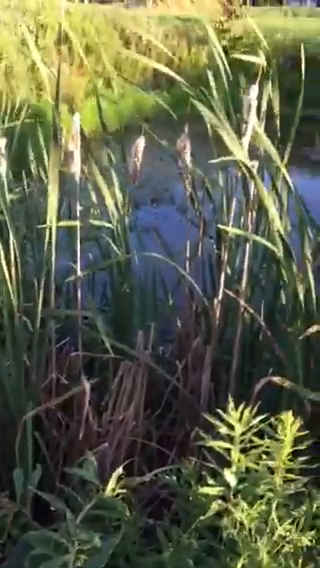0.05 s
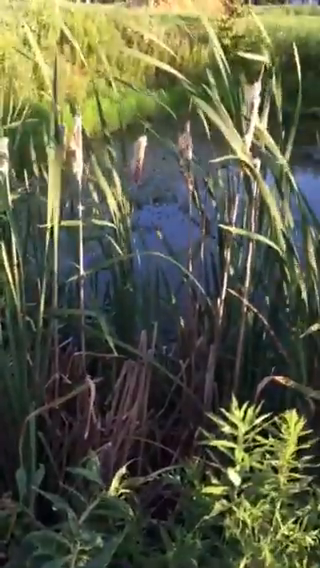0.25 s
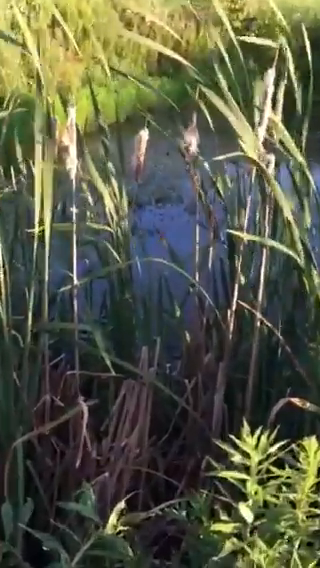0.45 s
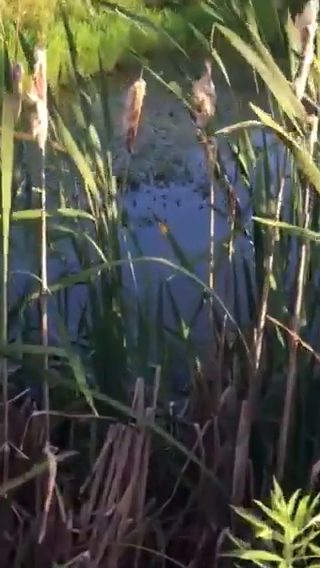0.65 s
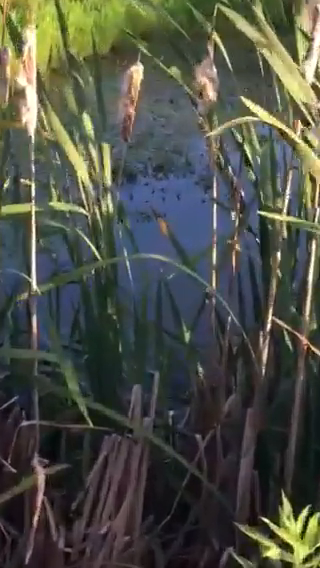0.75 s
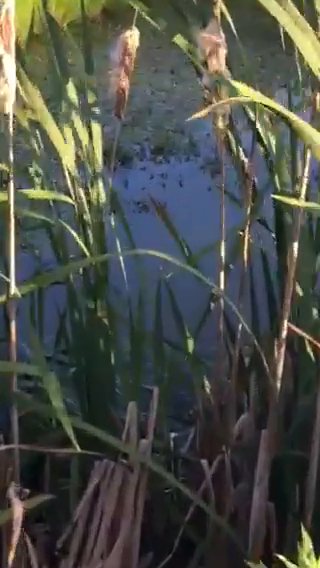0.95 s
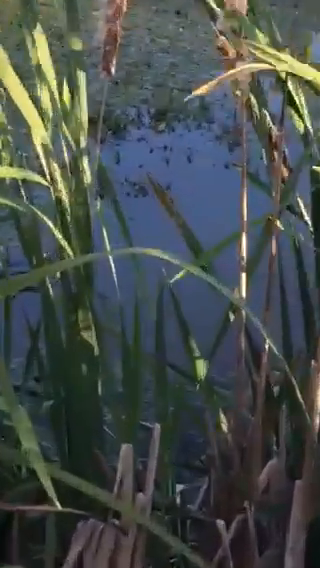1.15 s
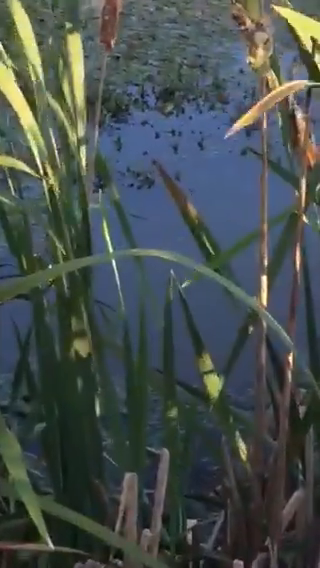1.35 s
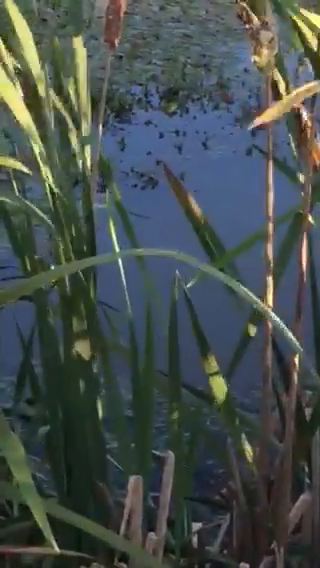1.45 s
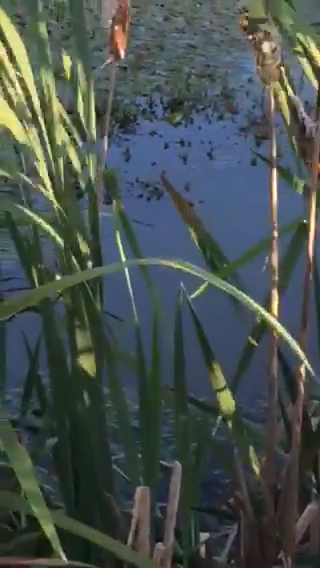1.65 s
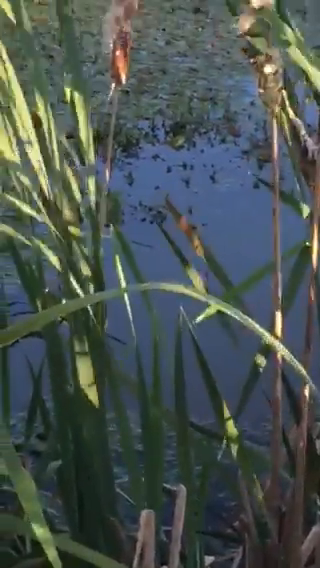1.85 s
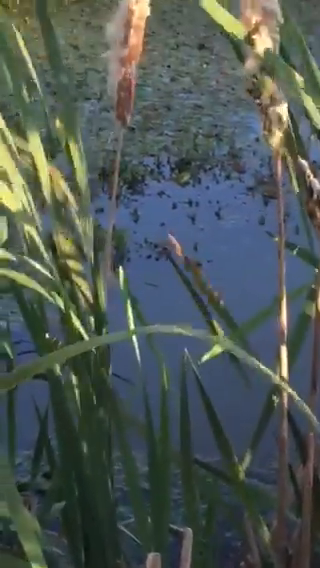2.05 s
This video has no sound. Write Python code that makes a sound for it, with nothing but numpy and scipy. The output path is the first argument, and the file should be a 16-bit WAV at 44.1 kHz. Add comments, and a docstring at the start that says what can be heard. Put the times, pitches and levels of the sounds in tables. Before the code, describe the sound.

Wind rumbles and thumps on the microphone, over a low drone and faint insect trills.

```python
"""Reeds at a pond edge, with distant traffic under everything. From the start, wind rumbles and flutters
on the microphone. An insect trills and faint far chirps begin. A gust strikes the microphone with dull
thumps, the hardest trailed by a brief bright hiss; then dry reeds rustle. As the wind settles to a low
rumble, a low drone, perhaps a bullfrog, swells. The insect trills again, and the drone fades away."""
import sys
import numpy as np
from scipy import signal
from scipy.fft import rfft, irfft
from scipy.io import wavfile
from scipy.ndimage import uniform_filter1d

SR = 44100
rng = np.random.default_rng(int(sys.argv[2]) if len(sys.argv) > 2 else 0)


def unload_wav(signal):
    """Save mono or channel-first audio to the path in sys.argv[1] as 16-bit WAV at rate SR, clipped to [-1, 1]."""
    wavfile.write(
        sys.argv[1],
        SR,
        np.round(np.clip(np.atleast_2d(signal).T, -1, 1) * 32767).astype(np.int16),
    )


N = 92610
TIME = np.arange(N) / SR
HZ = np.fft.rfftfreq(N, 1 / SR)

# short hisses; the first two trail the hardest wind thump, the rest are reed rustles:
# (middle [s], length [s], level [dB], pitch [Hz], width [Hz])
HISSES = [(.401, .012, -57, 1900, 800), (.42, .012, -55, 1500, 450), (.559, .007, -71, 10800, 1400),
          (1.047, .035, -73, 13900, 500), (1.042, .05, -78, 9000, 3000)]


def amp(db):
    """Turns decibels into a number to multiply a sound by (a gain)."""
    return 10 ** (np.asarray(db) / 20)


def unit(x):
    """Scales a signal to an average size (rms) of 1."""
    return x / np.sqrt(np.mean(x ** 2) + 1e-20)


def curve(points):
    """Joins (time, value) points with straight lines."""
    return np.interp(TIME, *np.transpose(points))


def colour(points, hz):
    """Reads the gain at hz from a curve of (frequency, level) points."""
    point_hz, db = np.transpose(points)
    return amp(np.interp(np.log(hz + 1), np.log(point_hz), db))


def noise(gain):
    """Noise of average size 1, with each frequency weighted by gain."""
    return unit(irfft(rfft(rng.standard_normal(N)) * gain, N))


def steady(x, size):
    """Evens out the chance swells of a noise over size samples."""
    power = abs(signal.hilbert(x)) ** 2
    return x / np.sqrt(uniform_filter1d(power, size) / 2 + 1e-9)


def band(hz, low_hz, high_hz, slope):
    """Gain that keeps low_hz to high_hz; a larger slope cuts the treble more steeply."""
    bass_cut = (hz / low_hz) ** 2 / np.hypot(1, (hz / low_hz) ** 2)
    return bass_cut / np.hypot(1, (hz / high_hz) ** slope)


def add(mix, start, sound):
    """Mixes a sound in, beginning at start seconds."""
    part = mix[max(round(start * SR), 0):][:len(sound)]
    part += sound[:len(part)]


def traffic(level_db=-59.5, patch_db=3.5, patch_top_hz=2200):
    """A far wash of tyres with narrow, drifting patches, under a smooth hiss of air."""
    # tone of the traffic and air: (frequency [Hz], relative level [dB])
    spectrum = [(20, -7), (100, -0.5), (300, -5), (550, -1.5), (1000, -1.5), (1300, -5), (1750, -7),
                (2500, -16), (3000, -17.5), (3800, -20), (5000, -25), (6500, -24.5), (7800, -28.5),
                (9500, -27), (10300, -32.5), (11200, -28.5), (15000, -31.5)]
    hz, _, slices = signal.stft(rng.standard_normal(N), SR, nperseg=2048, noverlap=1536)
    patches = uniform_filter1d(rng.standard_normal(slices.shape), size=4, axis=0)  # blur in pitch
    patches = unit(uniform_filter1d(patches, size=10, axis=1))  # blur in time
    depth_db = patch_db / (1 + (hz[:, None] / patch_top_hz) ** 4)
    slices = slices * colour(spectrum, hz)[:, None] * amp(depth_db * patches)
    wash = signal.istft(slices, nperseg=2048, noverlap=1536)[1][:N]
    return amp(level_db) * unit(wash)


def rumble():
    """Slowly swirling air presses on the microphone and makes a deep rumble."""
    # wind pressure on the microphone: (time [s], level [dB])
    pressure = [(0, -41), (.18, -32.5), (.25, -25.5), (.30, -32), (.34, -19), (.37, -38.5), (.405, -21.5),
                (.43, -15.5), (.48, -40), (.55, -27.5), (.585, -39.5), (.63, -32.5), (.70, -30.5),
                (.77, -26), (.84, -31.5), (.99, -44), (1.045, -35.5), (1.1, -43), (1.25, -34), (1.6, -36),
                (1.81, -34.5), (1.87, -43), (2.03, -38.5), (2.072, -35.5), (2.1, -36)]
    # tone of the rumble: (frequency [Hz], relative level [dB])
    spectrum = [(15, -41), (30, -20.5), (42, -10), (57, -1.5), (72, 0.5), (130, -4.5), (200, -14),
                (300, -31.5), (500, -64.5), (1000, -79), (3000, -100)]
    return amp(curve(pressure)) * steady(noise(colour(spectrum, HZ)), size=1500)


def housing(hz):
    """Gain of the microphone's case, which rings at a few pitches when wind hits it."""
    # ringing pitches of the case: (frequency [Hz], width [Hz], added gain [dB])
    rings = [(282.7, 28, -4), (504, 38, -9), (643, 22, -3.5), (966, 23, -8.5), (1050, 220, 1),
             (2060, 310, 5)]
    return 1 + sum(amp(db) / (1 + (2 * (hz - centre) / width) ** 2) for centre, width, db in rings)


def flutter(fade_s=0.0053, size=8192):
    """Short spells of faster swirling air within the gusts."""
    # bursts of flutter: (start [s], length [s], level [dB], treble cutoff [Hz])
    bursts = [(0, 0.023, -35.5, 192), (0.132, 0.14, -49.5, 278), (.252, 0.054, -29.5, 413),
              (.387, 0.032, -24, 567), (0.434, .007, -30, 713), (0.493, 0.048, -41, 406),
              (0.61, 0.064, -44, 430), (0.695, 0.052, -43.5, 322), (0.719, 0.073, -37.5, 269),
              (0.851, 0.076, -54, 346), (1.003, 0.072, -53.5, 292), (1.288, 0.012, -51, 208),
              (1.736, 0.092, -42.5, 252)]
    out, hz, t = np.zeros(N), np.fft.rfftfreq(size, 1 / SR), np.arange(size) / SR
    for start, length, db, cutoff_hz in bursts:
        begin = max(start - .03, 0)  # room to fade in
        outside_s = np.maximum(abs(begin + t - start - length / 2) - length / 2, 0)
        fade = np.exp(-(outside_s / fade_s) ** 2)
        gain = band(hz, low_hz=148, high_hz=cutoff_hz, slope=4.88) * housing(hz)
        air = irfft(rfft(rng.standard_normal(size)) * gain)
        add(out, begin, amp(db) * fade * steady(unit(air), size=600))
    return out


def insect():
    """A train of quick falling notes that swells, eases a little and stops dead."""
    # insect trills: (start [s], last pulse [s], base level [dB])
    trills = [(.09, .474, -59.5), (1.304, 1.7275, -59.5)]
    pulse_s, spacing_s, pitch_hz, sweep_hz_per_s = .013, .016, 6010, -122000
    rise_s, sag_s, sag_db = .12, 0.087, -4
    offset_db, waver_db = -1.5, 0.6
    out, t = np.zeros(N), np.arange(-pulse_s / 2, pulse_s / 2, 1 / SR)
    for start, last, db in trills:
        times = np.arange(last, start, -spacing_s)
        for when, (phase, waver, detune) in zip(times, rng.standard_normal((40, 3))):
            cycles = (pitch_hz + 25 * detune) * t + sweep_hz_per_s * t ** 2 / 2 + phase
            pulse = np.hanning(len(t)) * np.sin(2 * np.pi * cycles)
            swell = min((when - start) / rise_s, 1)
            sag = np.clip((when - start - rise_s) / sag_s, 0, 1)
            level_db = db + offset_db + waver_db * waver + sag_db * sag
            add(out, when - pulse_s / 2, amp(level_db) * swell * pulse)
    return out


def reed_echo(sound, echo_db=-3.5, decay_s=0.084):
    """The reeds scatter a sound, adding a short tail that falls 60 dB in decay_s."""
    tail = (rng.standard_normal(N) * np.exp(-np.log(1000) * TIME / decay_s))[:SR // 5]
    return sound + amp(echo_db) * signal.fftconvolve(sound, tail / np.linalg.norm(tail))[:N]


def wisp(middle, length, db, hz, width):
    """A brief, soft swell of noise around one pitch."""
    swell = np.exp(-(2 * (TIME - middle) / length) ** 2)
    return amp(db) * swell * noise(np.exp(-((HZ - hz) / width) ** 2 / 2))


def chirps():
    """Faint chirps and peeps from far away."""
    # far calls: (middle [s], length [s], level [dB], pitch [Hz], width [Hz])
    calls = [(.17, .05, -64, 1600, 160), (.342, .04, -70, 3900, 280), (.945, .04, -73, 4100, 450),
             (1.37, .1, -61.5, 1080, 20)]
    return sum(wisp(*row) for row in calls)


def thump(db, cutoff_hz, size=8192):
    """One swirl of air gives a push; the microphone's bass cut makes it swing back."""
    hz = np.fft.rfftfreq(size, 1 / SR)
    swirl = band(hz, low_hz=53.4, high_hz=cutoff_hz, slope=3.63) * hz / np.hypot(hz, .2 * cutoff_hz)
    gain = swirl * housing(hz) / np.hypot(1, (hz / (2.57 * cutoff_hz)) ** 5)
    # build the pulse with this tone that hits as early as possible (minimum phase)
    cepstrum = irfft(np.log(gain + 1e-5))
    first_half = np.arange(size) < size // 2
    pulse = irfft(np.exp(rfft(2 * cepstrum * first_half)))[:size // 2]
    return -amp(db) * pulse / pulse.max()


def thumps():
    """The strongest swirls strike the microphone one by one; a higher cutoff sounds sharper."""
    # blows of the wind: (peak time [s], peak level [dB], treble cutoff [Hz])
    blows = [(0.2552, -18, 150), (.328, -9.5, 350), (0.3847, -23.5, 1077), (.388, -9.5, 1100),
             (.397, -11.5, 380), (.4005, -8.5, 492), (0.407, -18, 166), (0.42, -15, 315),
             (0.5118, -36.5, 528), (0.532, -20.5, 390), (0.6149, -22, 414), (.627, -19, 110),
             (0.662, -20.5, 157), (0.743, -18.5, 278), (0.773, -19, 176), (.852, -26, 245)]
    out = np.zeros(N)
    for when, db, cutoff_hz in blows:
        pulse = thump(db, cutoff_hz)
        add(out, when - np.argmin(pulse) / SR, pulse)
    return out


def thump_hiss():
    """Brief bright hiss trailing the hardest wind thump."""
    return sum(wisp(*row) for row in HISSES[:2])


def rustles():
    """Dry reeds rustle in tiny bursts of high hiss."""
    return sum(wisp(*row) for row in HISSES[2:])


def drone(fade_in_s=.05):
    """A nearly pure low note, perhaps a bullfrog, with a few weak overtones."""
    # swell and fade of the note: (time [s], level [dB])
    levels = [(.86, -43), (.93, -39), (1.1, -37.5), (1.22, -34), (1.4, -35.5), (1.57, -34.5), (1.68, -44),
              (1.8, -77), (1.9, -79)]
    # drift of the note: (time [s], pitch [Hz])
    pitches = [(.9, 105.4), (1.25, 105), (1.57, 102), (1.8, 103.4)]
    # the note and its overtones: (multiple of the pitch, relative level [dB])
    harmonics = [(1, 7), (2, -32.5), (3, -27.5), (4, -34.5)]
    phase = 2 * np.pi * np.cumsum(curve(pitches)) / SR
    tone = sum(amp(db) * np.sin(round(multiple) * phase) for multiple, db in harmonics)
    fade_in = np.clip((TIME - levels[0][0]) / fade_in_s + 1, 0, 1)
    return unit(tone) * amp(curve(levels)) * fade_in


def scene():
    """Wind on the microphone over the life of the pond and far traffic, in one channel."""
    mix = rumble() + flutter() + reed_echo(insect()) + chirps()
    mix += thumps() + thump_hiss() + rustles() + drone()
    return (mix + traffic())[None]


def record(dry, top_hz=15200):
    """Cuts away the highest treble, above top_hz."""
    treble_cut = signal.firwin(1023, top_hz, window=("kaiser", 9), fs=SR)
    return signal.oaconvolve(dry, treble_cut[None], "same")


dry = scene()
out = record(dry)
unload_wav(out)
```